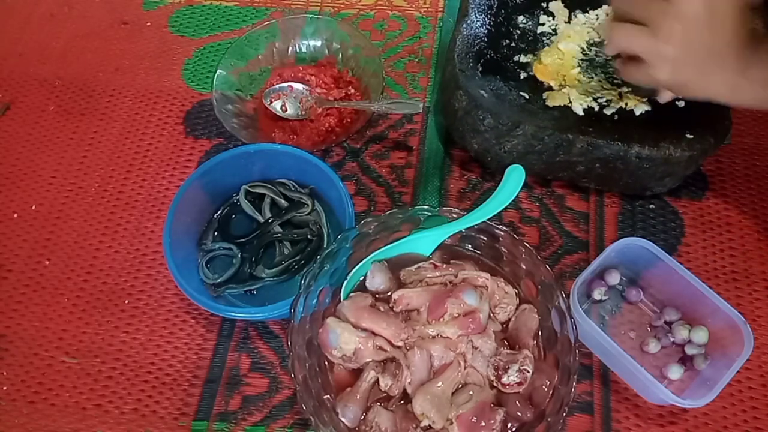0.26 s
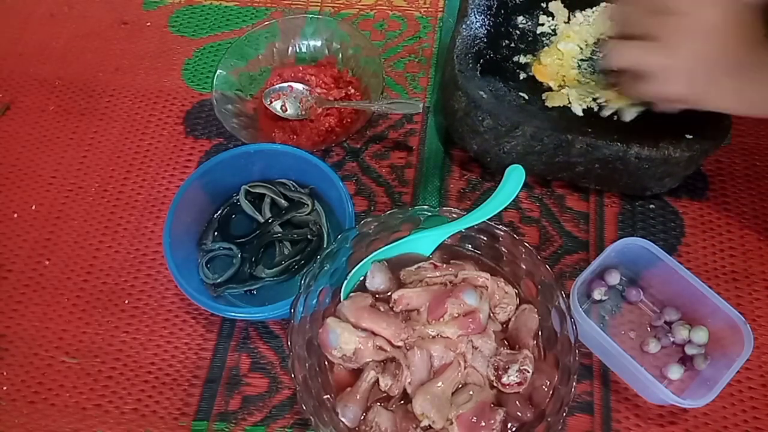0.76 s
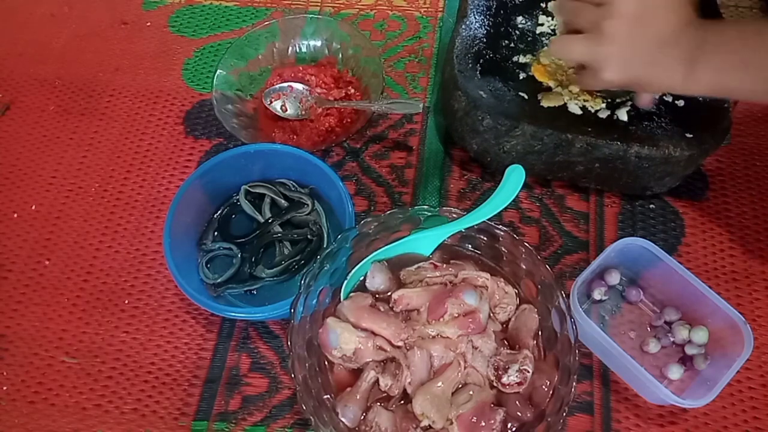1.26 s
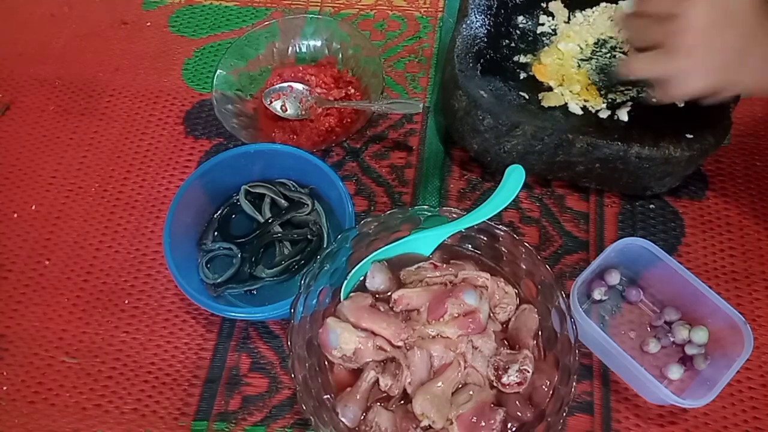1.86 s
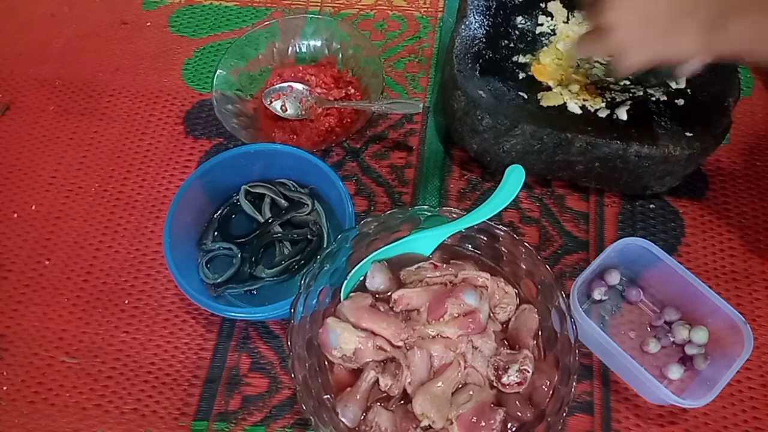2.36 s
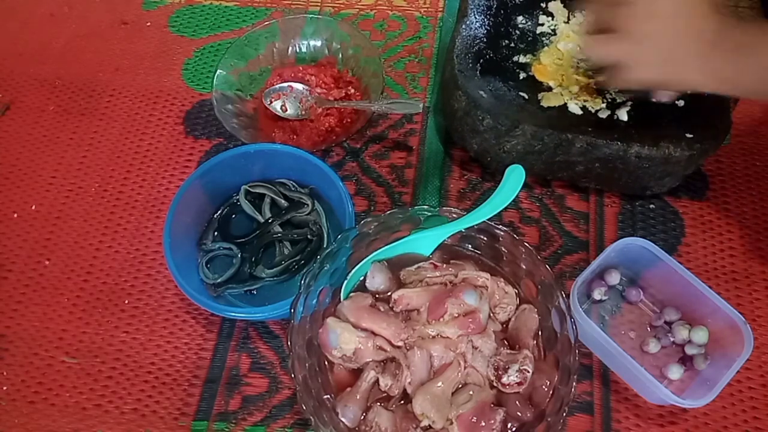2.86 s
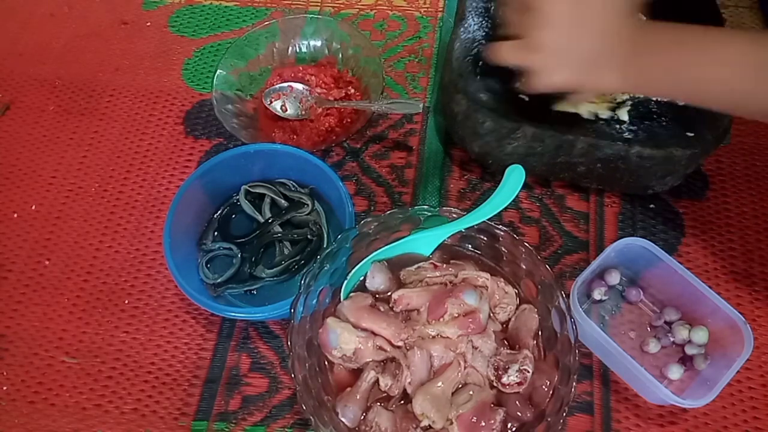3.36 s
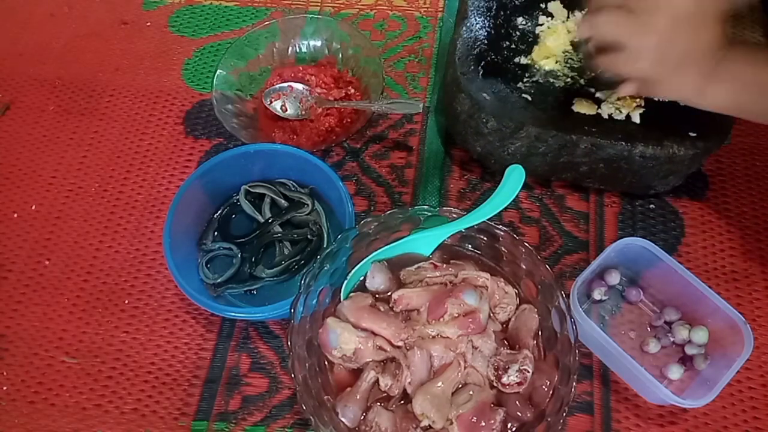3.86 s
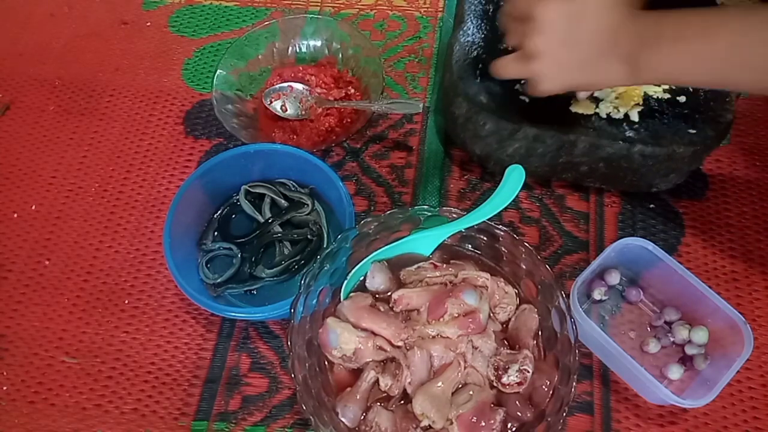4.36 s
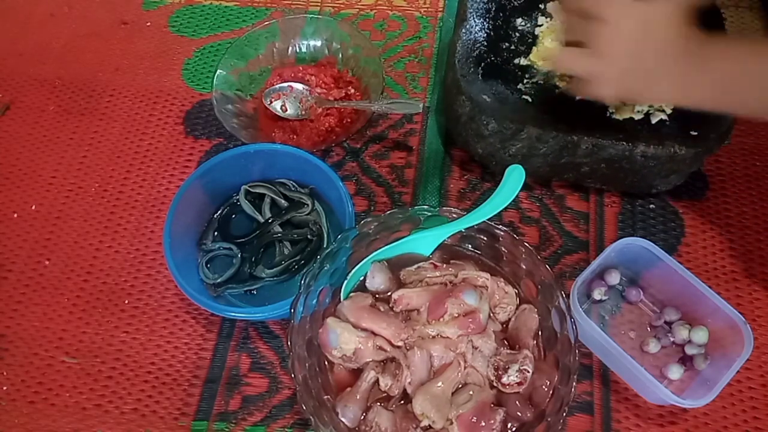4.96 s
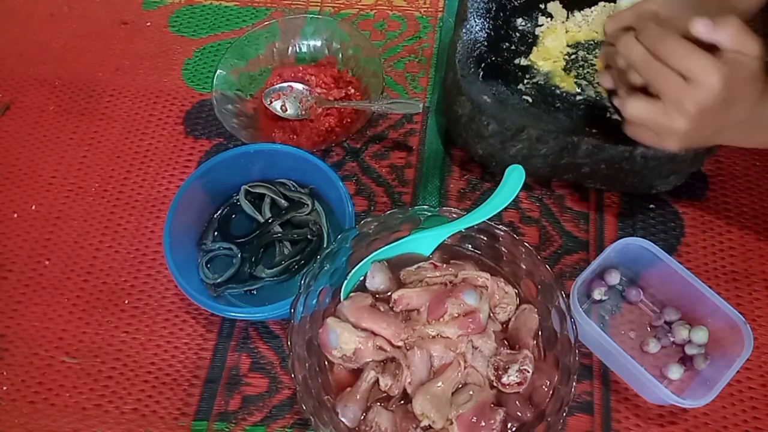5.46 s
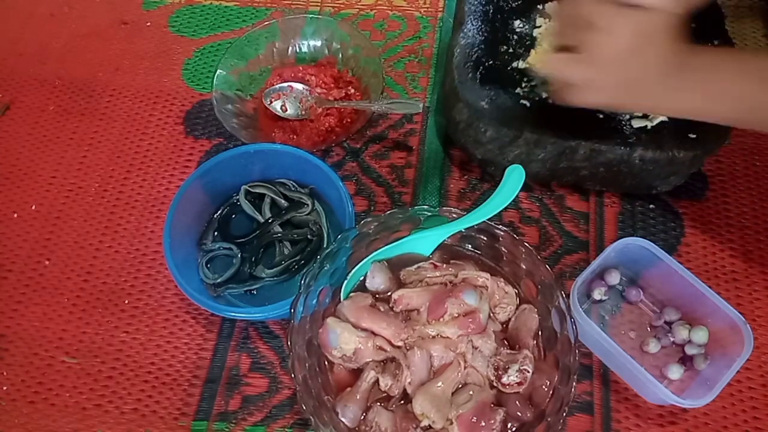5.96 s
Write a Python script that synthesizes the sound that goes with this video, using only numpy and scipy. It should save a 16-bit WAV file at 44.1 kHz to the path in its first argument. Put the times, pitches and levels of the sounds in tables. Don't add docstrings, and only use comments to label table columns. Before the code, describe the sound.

Quick irregular grinding of stone on stone in a small bare kitchen, heard close. First, crunchy crushing strokes with ringing catches and short moaning squeaks; then a hard clack past three seconds, drier scraping with snapping seeds, a second clack at about four and a half, and a sharp bright crack at five and a half. Faint traffic, motor, insects and a distant dove remain underneath.

```python
import sys
import numpy as np
from scipy import signal
from scipy.fft import rfft, irfft, next_fast_len
from scipy.io import wavfile

SR = 44100
rng = np.random.default_rng(int(sys.argv[2]) if len(sys.argv) > 2 else 0)


def gain_from_db(level_db):
    decades = np.asarray(level_db, float) / 20
    return 10 ** decades


def digitize_waveform(pressure):
    field = np.atleast_2d(pressure).T
    bounded = np.clip(field, -1, 1)
    quanta = np.round(bounded * 32767).astype(np.int16)
    wavfile.write(sys.argv[1], SR, quanta)


N = 273331
TIME = np.arange(N) / SR

# f/Hz, level/dB, t60/s
DEEP_MODES = [(690, -3, 0.13), (767.4, -2, 0.084), (820, -24, 0.046), (885, 0, 0.067), (975, -6.5, 0.13),
              (1037, -7.5, 0.24), (1126, -19.5, 0.064)]
UPPER_MODES = [(1150, -4.5, 0.077), (1306, -0.5, 0.037), (1422, 1, 0.12), (1470, 2, 0.042),
               (1559.6, 5, 0.12), (1680, 2.5, 0.089), (1773, -5.5, 0.16), (1862, 2, 0.031)]


def colour(x, table):
    hz, db = np.transpose(table)
    size = next_fast_len(len(x), True)
    f = np.maximum(np.arange(size // 2 + 1) * SR / size, 1)
    gain = gain_from_db(np.interp(np.log(f), np.log(hz), db, left=-90, right=-90))
    shaped = irfft(rfft(x, size) * gain / np.sqrt(np.mean(gain ** 2)), size)
    return shaped[:len(x)]


def coloured_noise(table):
    return colour(rng.standard_normal(N), table)


def unit(x):
    return x / np.sqrt(np.mean(x ** 2))


def through(x, response):
    return signal.fftconvolve(x, response)[:N]


def band(x, low_hz, high_hz, order=4):
    return signal.sosfilt(signal.butter(order, [low_hz, high_hz], "band", fs=SR, output="sos"), x)


def resonate(x, hz, width_hz):
    r = np.exp(-np.pi * width_hz / SR)
    poles = [1, -2 * r * np.cos(2 * np.pi * hz / SR), r * r]
    return np.sqrt(2 * (1 - r * r)) / 2 * signal.lfilter([1, 0, -1], poles, x)


def ring(modes):
    t = TIME[:SR // 3]
    out = 0
    for k, (hz, db, t60) in enumerate(modes):
        out = out + (-1) ** k * gain_from_db(db - 60 * t / max(t60, 0.002)) * np.sin(2 * np.pi * hz * t)
    return out


def wander(rate, spread_db):
    levels = rng.standard_normal(800)
    return np.interp(TIME * rate, np.arange(len(levels)), gain_from_db(spread_db * levels))


def blows(times, db):
    x = np.zeros(N)
    np.add.at(x, (np.asarray(times) * SR).astype(int), gain_from_db(db))
    return x


def slips(rate, spread_db):
    when = rng.random(N) < rate / SR
    size = rng.exponential(size=N)
    sign = np.sign(rng.standard_normal(N))
    return unit(when * gain_from_db(spread_db * np.minimum(size, 5)) * sign)


def strokes(shape, column):
    # start t/s, length/s, grit level/dB, deep ring level/dB, upper ring level/dB
    crushes = [(-0.003, 0.05, -49.5, -64, -54), (0.116, 0.081, -49, -55.5, -53),
               (0.275, 0.035, -56.5, -53.5, -43.5), (0.331, 0.022, -54.5, -60, -56),
               (0.669, 0.054, -51.5, -65, -61.5), (0.719, 0.032, -56, -51, -46.5),
               (0.776, 0.025, -52.5, -58, -56), (0.908, 0.047, -55.5, -48.5, -48),
               (1, 0.02, -58.5, -64, -54), (1.074, 0.066, -55.5, -51.5, -43),
               (1.158, 0.058, -63.5, -57, -63), (1.252, 0.044, -61.5, -48, -46),
               (1.323, 0.038, -54.5, -59, -53.5), (1.415, 0.063, -54.5, -54, -47.5),
               (1.78, 0.035, -50.5, -66, -78), (1.832, 0.037, -59, -42.5, -46.0),
               (1.901, 0.02, -59, -44.5, -56), (2.034, 0.06, -55, -41.5, -41),
               (2.175, 0.053, -55, -44.5, -44), (2.306, 0.085, -68.5, -76, -62),
               (2.549, 0.053, -56.5, -54, -59), (2.601, 0.074, -56, -43.5, -49.5),
               (2.786, 0.087, -54.5, -50, -46.5), (2.947, 0.056, -54.5, -53, -48)]
    scrapes = [(3.278, 0.065, -49.5, -43.5, -43), (3.348, 0.08, -52, -59, -51.5),
               (3.524, 0.04, -49.5, -64.5, -54.5), (3.583, 0.037, -56.0, -57, -56.5),
               (3.748, 0.026, -54.5, -60.5, -51), (3.789, 0.03, -51.5, -57.5, -56.5),
               (3.888, 0.063, -53, -57.5, -57), (4.071, 0.095, -53, -59.5, -54.5),
               (4.23, 0.056, -54, -51.5, -53.5), (4.384, 0.022, -65, -57, -60.5),
               (4.475, 0.045, -70, -45.5, -53), (4.534, 0.035, -53.5, -78, -72),
               (4.612, 0.043, -53, -62, -53), (4.684, 0.053, -48, -58.5, -49.5),
               (4.875, 0.078, -50.5, -65.5, -58.5), (5.034, 0.025, -51.5, -54.5, -52),
               (5.14, 0.1, -67.5, -72.5, -74), (5.333, 0.062, -66.5, -76, -72.5),
               (5.446, 0.083, -56, -75, -59), (5.516, 0.069, -51.5, -63.5, -66.5),
               (5.714, 0.087, -54.5, -73, -65.5), (5.876, 0.048, -54.5, -65, -57.5),
               (5.97, 0.17, -65, -65.5, -62), (6.146, 0.036, -62, -71, -64.5)]
    lag_s, attack_db, lean_db, crown_db, release_db = shape
    rows = np.array(crushes + scrapes)
    coarse = TIME[::64]
    t = coarse - rows[:, :1] - lag_s
    length = np.maximum(rows[:, 1:2], 0.01)
    u = 2 * np.clip(t / length, 0, 1) - 1
    db = attack_db * np.minimum(t, 0) - release_db * np.maximum(t - length, 0)
    db = db + lean_db * u + crown_db * (0.5 - u * u)
    return np.interp(TIME, coarse, gain_from_db(rows[:, [column]] + db).sum(axis=0))


def background():
    # t/s, rumble level/dB
    traffic = [(0.0, -58.5), (0.14, -62), (1.59, -60.5), (1.66, -80), (1.79, -60), (3.18, -67), (3.23, -60),
               (3.73, -61.5), (3.76, -54), (4.09, -68), (4.16, -58), (4.31, -65.5), (4.77, -58),
               (5.54, -61.5), (5.99, -57.5), (6.2, -60)]
    # t/s, drone level/dB
    motor = [(0.0, -72), (0.6, -80), (1.17, -77), (1.71, -82), (1.98, -71), (2.21, -74.5), (2.35, -74.5),
             (2.97, -82), (3.3, -74), (3.45, -76), (3.71, -79), (3.93, -65.5), (4.23, -73.5), (4.63, -65),
             (4.87, -80), (5.4, -77), (5.54, -73.5), (6.2, -75)]
    # f/Hz, level/dB per Hz
    rumble_colour = [(12, -51.5), (20, -18), (27, -21), (40, -17.5), (48, -5), (81, 3), (162, -1.5),
                     (219, -15), (260, -16), (340, -35.5), (570, -120)]
    drone_colour = [(120, -30), (200, 0.5), (221, -16.5), (307, -1), (350, 0.5), (460, -3.5), (528, -16),
                    (600, -1), (780, -31.5), (1320, -120)]
    air_colour = [(290, -69), (500, -47), (595, -15.5), (640, -23), (688, -7), (831, -27), (893, -12.5),
                  (2980, -6.5), (4530, -18), (6060, -34), (8450, -12.5), (10500, -32), (15400, -34),
                  (15750, -60)]

    traffic_db = np.interp(TIME, *np.transpose(traffic)) - 0.4
    heave = wander(9.7, 2.9) * wander(22, 2.8)
    rumble = gain_from_db(traffic_db) * heave * coloured_noise(rumble_colour)

    motor_db = np.interp(TIME, *np.transpose(motor)) + 0.88
    drone = gain_from_db(motor_db) * wander(15, 3.2) * coloured_noise(drone_colour)

    air = coloured_noise(air_colour)
    edges_hz = [300, 750, 1200, 1800, 2700, 4000, 6000]
    patches = 0
    for low_hz, high_hz in zip(edges_hz, edges_hz[1:]):
        patches = patches + (wander(12, 2.5) - 1) * band(air, low_hz, high_hz, order=2)
    return rumble + drone + gain_from_db(-70) * (air + patches)


def dove():
    # t/s, length/s, start f/Hz, end f/Hz, level/dB
    coos = [(0.0, 0.21, 650, 640, -59), (.47, 0.33, 797, 832, -80), (0.826, 0.14, 716, 690, -60),
            (1.627, 0.062, 702, 707, -61.5), (1.774, 0.067, 503, 494, -55.5), (2.3, 0.2, 602, 615, -64),
            (3.078, 0.094, 345, 354, -71), (4.263, 0.071, 406, 430, -68.5), (5.134, 0.034, 600, 598, -68),
            (5.315, 0.066, 690, 703, -61.5), (5.519, 0.048, 354, 361, -65.5),
            (5.603, 0.053, 388, 418, -71.5), (5.548, 0.17, 685, 693, -64), (5.699, 0.06, 356, 368, -71),
            (5.756, 0.091, 685, 704, -60.5), (5.901, 0.14, 690, 690, -66)]
    out = np.zeros(N)
    flutter, waver = wander(110, 4.4), wander(40, 0.15)
    for s, length, hz0, hz1, db in coos:
        at = slice(int(s * SR), int((s + length) * SR))
        u = (TIME[at] - TIME[at][0]) / length
        pitch_hz = waver[at] * (hz0 + (hz1 - hz0) * u)
        swell = np.sqrt(np.sin(np.pi * u).clip(0))
        out[at] += gain_from_db(db + 2.0) * swell * np.sin(2 * np.pi * np.cumsum(pitch_hz) / SR)
    return 1.64 * out * (np.minimum(flutter, 1.6) - 0.6)


def ticks():
    # t/s, level/dB
    flicks = [(0.2114, -50), (0.3306, -51), (0.6185, -58), (0.6868, -46), (0.7881, -46), (0.9168, -55),
              (1.3508, -50), (1.3698, -43), (1.7774, -56), (2.1824, -50), (2.5311, -52), (2.9821, -53),
              (3.5329, -50), (5.5049, -32), (5.882, -50)]
    s, db = np.transpose(flicks)
    decay = gain_from_db(-60 * TIME[:900] / 0.018)
    rustle = through(blows(s, db - 3.0), decay) * rng.standard_normal(N)
    return 2.5 * band(rustle, 4600, 8800, order=2) + 0.6 * band(rustle, 9000, 15000, order=2)


def squeals():
    # t/s, length/s, f/Hz, level/dB
    bowed = [
        (0.283, .03, 1559, -40),
        (0.326, .028, 1559, -41),
        (1.908, .06, 885, -40),
        (2.03, .11, 1046, -43),
        (4.472, .06, 850, -42),
    ]
    out = np.zeros(N)
    grip = wander(120, 2.5)
    for s, length, hz, db in bowed:
        u = np.clip((TIME - s) / length, 0, 1)
        swell = np.sqrt(np.sin(np.pi * u).clip(0))
        out += gain_from_db(db) * swell * np.sin(2 * np.pi * hz * TIME)
    return out * grip


def snaps():
    # t/s, level/dB
    splits = [
        (0.619, -51),
        (1.0165, -46),
        (1.0809, -46.5),
        (1.37, -45),
        (2.8459, -44),
        (3.7943, -42),
        (5.5058, -26.5),
        (5.881, -43),
        (6.0026, -40),
    ]
    s, db = np.transpose(splits)
    body = blows(s, db + 7.5)
    top = blows(s, db + 3.0 + 0.9 * (db - db.max()))
    return band(body, 1500, 4600, order=2) + band(top, 5000, 16000, order=2)


def cracks(table):
    bodies, edges = np.zeros(N + 800), np.zeros(N + 800)
    t = TIME[:800]
    for s, db, hz, top_db in table:
        noise = rng.standard_normal(800)
        at = slice(int(s * SR), int(s * SR) + 800)
        crumble = gain_from_db(0.5 - 60 * t / 0.017) * noise
        tone = gain_from_db(-60 * t / 0.0094) * np.sin(2 * np.pi * hz * t)
        bodies[at] += gain_from_db(db - 4.0) * (tone + crumble)
        edges[at] += gain_from_db(db + top_db - 4.5 - 60 * t / 0.0061) * noise
    return band(bodies[:N], 1800, 4700, order=3) + band(edges[:N], 5200, 10500, order=2)


def catches():
    # t/s, level/dB, ring f/Hz,
    # t60/s
    stone_rings = [(0.266, -34.5, 1580, 0.038), (0.71, -36, 1760, 0.03), (0.729, -42, 1470, 0.037),
                   (0.743, -37, 1530, 0.035), (0.784, -34.5, 795, 0.032), (0.961, -34, 1524, 0.043),
                   (1.011, -34, 1450, 0.03), (1.049, -38, 1370, 0.03), (1.075, -36, 1560, 0.038),
                   (1.109, -31.5, 1540, 0.026), (1.122, -29.5, 1596, 0.039), (1.272, -34, 996, 0.034),
                   (1.289, -27, 1000, 0.028), (1.334, -37, 1380, 0.03), (1.417, -31, 1540, 0.023),
                   (1.458, -36, 1580, 0.027), (1.866, -32, 1460, 0.027), (2.034, -33, 1046, 0.037),
                   (2.045, -30, 1046, 0.032), (2.068, -28.5, 1040, 0.034), (2.085, -24, 1407, 0.041),
                   (2.092, -26, 1200, 0.046), (2.098, -26, 1430, 0.046), (2.174, -35.5, 1490, 0.03),
                   (2.21, -36, 1340, 0.03), (2.239, -32, 940, 0.025), (2.632, -32, 860, 0.03),
                   (2.643, -26.5, 906, 0.043), (2.819, -30.5, 1040, 0.038), (2.847, -28, 1480, 0.03),
                   (2.948, -37, 1460, 0.03), (2.963, -33.5, 1725, 0.033), (2.979, -37, 1560, 0.034),
                   (3.002, -33.5, 790, 0.044), (3.248, -22, 1320, 0.017), (3.262, -24, 990, 0.03),
                   (3.287, -19.5, 802, 0.033), (3.313, -27, 719, 0.03), (3.334, -28, 884, 0.03),
                   (3.603, -34, 1740, 0.025), (4.447, -22.5, 763, 0.03), (4.453, -18.5, 756, 0.024),
                   (4.469, -31, 810, 0.03), (4.637, -38, 1420, 0.03), (4.679, -34, 1530, 0.03),
                   (1.906, -46, 2430, 0.088), (1.909, -28.5, 885, 0.045), (2.789, -39, 1410, 0.032),
                 (3.239, -21.5, 2170, 0.04), (3.258, -28, 2100, .04), (3.267, -29, 2200, 0.028),
                 (3.295, -34, 1890, .05), (3.315, -36, 2300, .05), (3.39, -40, 2400, 0.054),
                 (4.443, -32.5, 2420, .08), (4.456, -28.5, 1080, .06), (4.462, -34, 1700, .05),
                 (4.49, -45, 2450, .09), (4.495, -34, 797, .06), (4.513, -38, 1410, 0.035),
                 (4.52, -42, 2410, .06), (4.548, -27.5, 820, .025), (4.548, -29, 1400, 0.018),
                 (3.24, -20.5, 1090, 0.047), (3.246, -23.5, 1750, 0.045), (4.444, -29, 560, 0.038),
                 (5.05, -39.5, 888, 0.033), (5.46, -45, 1490, 0.046), (5.513, -41, 1530, .04),
                 (5.93, -48, 1900, .05), (6.05, -51, 1800, .06), (6.178, -43, 1570, .03)]
    out = np.zeros(N + 4000)
    t = TIME[:4000]
    for s, db, hz, t60 in stone_rings:
        cluster = np.sin(2 * np.pi * hz * t)
        cluster += 0.52 * np.sin(2 * np.pi * 0.99 * hz * t)
        cluster -= 0.45 * np.sin(2 * np.pi * 0.883 * hz * t)
        click = gain_from_db(-5.5 - 60 * t / 0.0066) * np.sin(2 * np.pi * 1.5 * hz * t)
        decay = gain_from_db(-60 * t / max(t60, 0.005))
        out[int(s * SR):][:4000] += gain_from_db(db - 6.5) * (decay * cluster + click)
    return band(out[:N], 560, 2900, order=2)


def knocks():
    # t/s, deep level/dB, then upper, bright and floor thump relative to deep/dB
    hits = [(1.006, -44.5, 14, -6, 0), (1.288, -37, 4, -30, -44), (1.418, -52.5, 23.5, -11, -11),
            (1.833, -35, 4, -24, -24), (1.85, -34.5, 8.5, -18, -23), (1.909, -29, -19, -13, -42),
            (1.926, -28, -8, -8, -42), (2.019, -44, 10, -13, -26), (2.58, -34.5, 3, -23, -20),
            (2.622, -27, -0.5, -34, -17.5), (2.664, -26, -3.5, -16, -19), (2.795, -35.5, -25, -20, -33),
            (3.003, -41, -10, -31.5, -20.5), (3.236, -14.5, 2.5, 7.5, -17.5), (3.736, -54.5, 12, 19, 3.5),
            (4.073, -51.5, 13, -6, 1), (4.442, -21.5, 2.5, -8, -16), (4.547, -34.5, 7, -19, -12),
            (5.061, -42, -2, -22, -31), (6.177, -61, 3, 16, -3)]
    # f/Hz, level/dB, t60/s
    bright_modes = [(1963, 0.5, 0.17), (2200, 5, 0.02), (2100, -8, 0.036), (2470, 7, 0.058),
                    (2990, -31.5, 0.085)]
    # f/Hz, level over the modes/dB, t60/s
    thuds = [(837, 15, 0.0062), (1420, 21, 0.0055), (2420, 22.5, 0.0036), (3220, 0, 0.0097)]
    # f/Hz, level/dB, t60/s
    mat_modes = [(200, 0, 0.03), (374, 1, 0.05), (508, -2, 0.059)]
    s, deep, upper, bright, mat = np.transpose(hits)
    families = [(thuds[:1] + DEEP_MODES, deep + 3),
                (thuds[1:2] + UPPER_MODES, deep + upper + 3),
                (thuds[2:3] + bright_modes, deep + bright + 6),
                (thuds[3:], deep + 4 * np.minimum(bright, 0) + 12.7)]
    stone = 0
    for modes, db in families:
        body = ring(modes)
        strike = blows(s, db - 2.0)
        bounces = blows(s + 0.001412, db - 7.5) + blows(s + 0.0062, db - 16.0)
        stone = stone + through(strike + bounces, body / np.max(np.abs(body)))
    stone = band(band(stone, 690, 5500, order=3), 200, 3900)
    thump = band(through(blows(s, deep + mat - 3.0), ring(mat_modes)), 100, 520, order=2)
    contact = np.hanning(16)
    contact = contact / contact.sum()
    return through(through(stone + thump, contact), contact)


def grinding():
    # lag/s, attack/(dB/s), lean/dB, mid-stroke crown/dB, release/(dB/s)
    grit_shape = (-0.0063, 459, 3.1, 3.5, 290)
    deep_shape = (0.043, 750.5, -4.8, 2, 332)
    upper_shape = (0.0144, 646.5, -2, 1, 334)
    dust_shape = (0.014, 500, -1.5, 1.5, 260)
    # f/Hz, width/Hz, level/dB
    grit_bands = [(2060, 240, -6.5), (2468, 280, -5.5), (2774, 233, -7), (3097, 210, -8), (3340, 100, -9.5),
                  (3600, 145, -4), (3900, 200, -6), (4300, 260, -6), (4630, 67, -15)]
    # f/Hz, level/dB per Hz
    dust_colour = [(2940, -10), (4700, -8), (5510, -14), (6890, -6.5), (10600, -26.5), (12400, -26),
                   (13400, -31), (15300, -24), (15700, -59)]
    # t/s, fine dust over grit level/dB
    dryness = [(0, -22), (.4, -15), (.7, -15), (.82, -17), (.92, -19), (1.16, -21), (1.33, -17),
               (1.9, -20.5), (2.2, -15.5), (2.35, -29), (2.6, -21), (3.0, -14.5), (3.28, -21.5), (3.5, -21),
               (3.9, -18.5), (4.5, -19), (4.7, -20.5), (5.0, -18), (6.2, -17.5)]

    judder = wander(90, 2.02)
    deep_press = strokes(deep_shape, column=3)
    upper_press = strokes(upper_shape, column=4)
    out = 0
    for modes, press, low_hz, high_hz in ((DEEP_MODES, gain_from_db(-8.0) * deep_press, 640, 1250),
                                          (UPPER_MODES, gain_from_db(-13.0) * upper_press, 1080, 1900)):
        force = slips(900, 1.84) * press * judder
        body = 0
        for hz, mode_db, t60 in modes:
            push = force * gain_from_db(mode_db) * wander(24, 2.85)
            body = body + resonate(push, hz, 18 + 3.66 / t60)
        out = out + band(body, low_hz, high_hz, order=2)

    weight = slips(700, 3.8) * judder * gain_from_db(-7.0) * deep_press
    out = out + band(weight, 220, 510, order=2)

    rasp = (slips(4000, 2.0) + 0.18 * slips(330, 4.4)) * judder
    grains = rasp * gain_from_db(-5.5) * strokes(grit_shape, column=2)
    patches = 0
    for hz, width_hz, db in grit_bands:
        patches = patches + gain_from_db(db) * resonate(grains * wander(22, 4.5), hz, width_hz)
    out = out + band(patches, 2044, 4233)

    dust_gain = strokes(dust_shape, column=2) * gain_from_db(np.interp(TIME, *np.transpose(dryness)) + 4.0)
    flurry = wander(110, 3.0)
    dust = colour(0.6 * rasp + 0.45 * slips(5000, 5.5), dust_colour)
    return out + dust_gain * flurry * dust


def kitchen(x):
    # f/Hz, level/dB per Hz
    echo_colour = [(88, -62), (150, -9), (341, -4), (401, -0.5), (632, -14), (885, -3), (1140, -10),
                   (1800, -7.5), (2500, -5.5), (2910, -10.5), (4320, -10), (5000, -32), (6500, -65.5),
                   (11000, -120)]
    room_t60_s, build_s = 0.35, 0.011
    t = TIME[:SR]
    tail = colour(rng.standard_normal(SR), echo_colour)
    tail = tail * gain_from_db(-60 * t / room_t60_s) * np.clip(t / build_s, 0, 1)
    return through(x, tail / np.sqrt(np.sum(tail ** 2)))


def scene():
    # t/s, level/dB, centre f/Hz, top end over body/dB
    seeds = [(0.133, -34, 3900, -31), (0.3531, -36.5, 3600, -32), (0.619, -48, 3820, -6),
             (0.6547, -41, 3800, -11), (0.9184, -33, 3150, -31), (1.0809, -35, 3430, -32),
             (1.247, -38.5, 3580, -29), (1.3099, -41, 3530, -11), (1.3708, -33, 4300, -37),
             (1.437, -45, 3140, -23), (1.7674, -37.5, 3220, -28), (1.7993, -32.5, 3640, -22),
             (2.012, -58, 2480, -22), (2.529, -42, 4000, -14), (2.8464, -30.5, 3380, -29),
             (3.542, -30, 4140, -24), (3.741, -39, 2720, -30), (3.7951, -28.5, 3740, -37),
             (3.901, -40, 3110, -29), (4.2412, -30, 3060, -25), (4.386, -43, 2830, -25),
             (4.6064, -33, 3800, -27), (4.685, -30, 2820, -35.5), (4.8838, -43, 3380, -24),
             (5.0527, -33.5, 2400, -22), (5.506, -26.5, 3530, -8), (5.7074, -43, 3900, -28),
             (5.8374, -44, 2100, -21), (5.8815, -32.5, 3830, -29), (6.0028, -35, 3600, -35)]
    further_cracks = [(0.6878, -37, 3630, -18), (0.7114, -35, 3270, -17), (0.7876, -37, 3650, -22),
                      (1.0164, -42, 2370, -18), (1.3498, -42, 4040, -26), (2.172, -48, 3360, -19),
                      (2.6643, -47, 3620, -31), (3.5199, -43, 3600, -24), (3.5688, -30.5, 3900, -32),
                      (3.7658, -40, 2400, -19), (3.8881, -39, 3110, -29), (3.9744, -43, 3210, -22),
                      (4.1405, -38, 3700, -24), (4.5374, -42, 2550, -17), (4.5815, -42, 2840, -24),
                      (4.6164, -34, 3750, -25), (4.7037, -27, 2420, -34), (4.9023, -32, 3900, -25),
                      (4.9427, -33, 3160, -23), (5.019, -40, 4220, -25), (5.031, -40, 2500, -20),
                      (5.5294, -34, 3420, -27), (5.7558, -38, 3650, -23), (5.7862, -45, 3140, -25),
                      (6.1499, -36, 2850, -19)]
    bird = dove()
    hits = knocks()
    grind = grinding() + cracks(seeds) + catches() + snaps()
    wet = kitchen(gain_from_db(-20.0) * grind + gain_from_db(-14.0) * hits + gain_from_db(-7.5) * bird)
    small_bits = cracks(further_cracks) + ticks() + squeals()
    return (background() + bird + small_bits + hits + grind + wet)[None]


def low_pass(x):
    return signal.sosfilt(signal.butter(12, 16460, fs=SR, output="sos"), x)


def record(dry):
    return low_pass(dry)


dry = scene()
out = record(dry)
digitize_waveform(out)
```